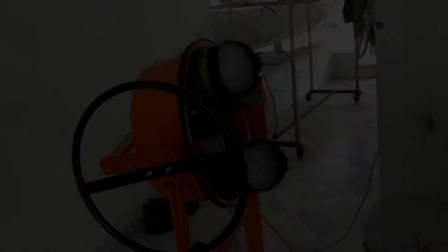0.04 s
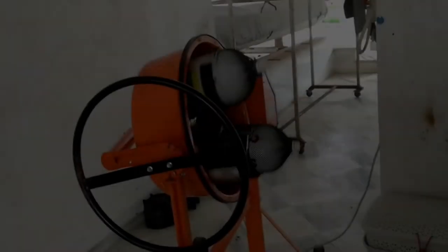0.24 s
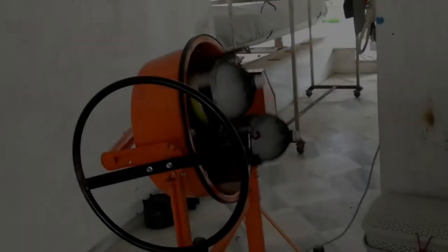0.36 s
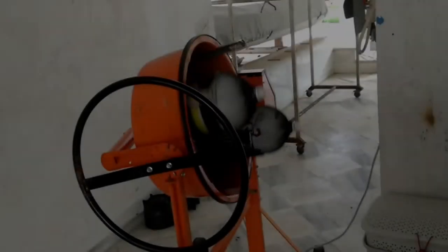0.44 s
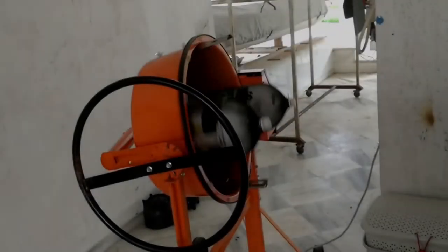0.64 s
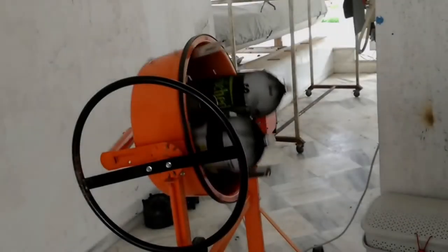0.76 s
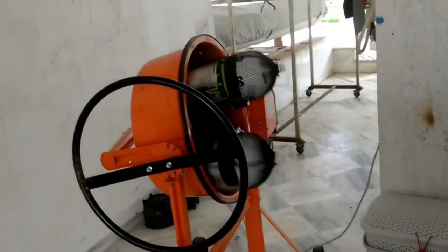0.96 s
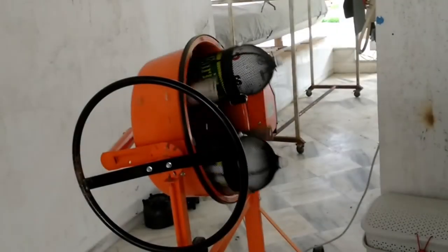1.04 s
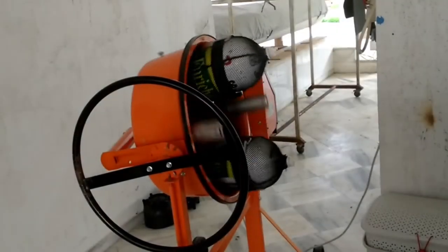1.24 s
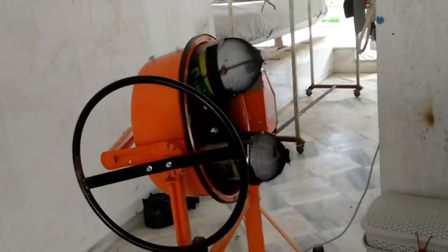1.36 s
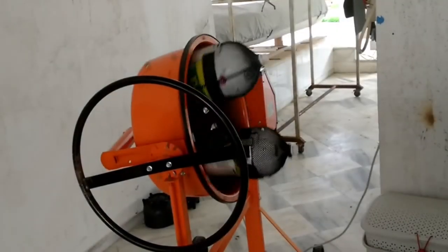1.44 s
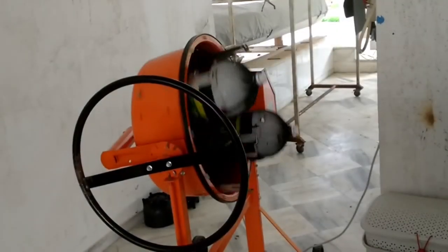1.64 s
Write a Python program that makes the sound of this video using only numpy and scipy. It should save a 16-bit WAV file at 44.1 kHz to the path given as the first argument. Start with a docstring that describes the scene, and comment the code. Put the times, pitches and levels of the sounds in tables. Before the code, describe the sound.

An electric mixer drum turns with metal tanks tumbling inside. It starts at about 0.2 seconds, after silence and a microphone pop. The motor hums and whines, the gears rattle, and the steel shell booms and groans as the tanks roll and scrape. Soft thuds come around 0.3 seconds, stronger ones from 1.4 to 1.6 seconds, echoing briefly in a bare room over light hiss.

```python
"""A pop as the microphone switches on, then an electric mixer drum turning in a bare room.
The motor hums and whines, and a small gear (the pinion) rattles along the big ring gear.
Two metal tanks tumble inside: they roll and bump against the steel shell and make it boom and groan.
The microphone adds its own hiss and a faint low tone on the left."""
import sys
import numpy as np
from scipy import signal
from scipy.fft import rfft, irfft
from scipy.io import wavfile
from scipy.ndimage import uniform_filter1d

SR = 44100
rng = np.random.default_rng(int(sys.argv[2]) if len(sys.argv) > 2 else 0)


def waveform_to_disk(signal):
    """Save audio, clipped to [-1, 1], as 16-bit WAV at the path in sys.argv[1]."""
    frames = np.transpose(np.atleast_2d(signal))
    scaled = np.clip(frames, -1, 1) * 32767
    samples = np.round(scaled).astype(np.int16)
    wavfile.write(sys.argv[1], SR, samples)


N = 74970
TIME = np.arange(N) / SR
PAN = np.array([[.5], [-.5]])  # splits a left-minus-right level between the two sides

# A mode is a pitch at which metal rings; a wider one dies sooner.
# low modes of the shell: pitch_hz, width_hz, relative_db
LOW_MODES = [(121.4, 9.7, -3.5), (153, 13, -1.5), (203.8, 19, -3), (226.5, 17, -1), (248.6, 35, 0),
             (291.3, 24, -2), (322.4, 18.5, -0.5), (338.6, 20.7, 1.5), (374, 17.5, -1.5)]
# middle modes of the shell and tanks: pitch_hz, width_hz, relative_db
MIDDLE_MODES = [(459, 34, -1), (501.4, 21.5, -0.5), (557.6, 21, -3), (610.4, 8, -7.5), (664.2, 20, -2.5),
                (731, 15, -6), (790, 32, -3), (886, 27, -9.5), (950, 46, -3)]


def from_db(db):
    """Turn decibels into a number to multiply by."""
    return 10 ** (np.asarray(db) / 20)


def rms_one(x):
    """Scale a sound so that its average strength (rms) is one."""
    return x / np.sqrt(np.mean(x ** 2) + 1e-20)


def in_time(rows):
    """Join (time, value) points with straight lines."""
    return np.interp(TIME, *np.transpose(rows))


def over_pitch(rows, column=1):
    """Join (pitch, value) points into a curve across the whole spectrum."""
    rows = np.array(rows)
    hz = np.fft.rfftfreq(N, 1 / SR)
    return np.interp(np.log(hz + 1e-9), np.log(rows[:, 0]), rows[:, column])


def drift(rate_hz, step=40):
    """A slow random wander, about one in size, worked out every few samples."""
    memory = np.exp(-2 * np.pi * step * rate_hz / SR)
    run_in = 2000
    noise = rng.standard_normal(N // step + run_in + 2)
    slow = signal.lfilter([1], [1, -2 * memory, memory ** 2], noise)[run_in:]
    return np.interp(np.arange(N) / step, np.arange(len(slow)), rms_one(slow))


def wavering(hz, waver, rate_hz=4.7):
    """A tone that wanders in loudness and a little in pitch."""
    phase = 2 * np.pi * (hz * TIME + rng.random())
    tone = (1 + waver * drift(rate_hz)) * np.sin(phase)
    return rms_one(tone + waver * drift(rate_hz) * np.cos(phase))


def colour(x, spectrum, column=1):
    """Turn each pitch in a sound up or down by a table of decibels."""
    return irfft(rfft(x) * from_db(over_pitch(spectrum, column)), N)


def widen(mid, side):
    """Two unrelated sounds become left and right: alike in the bass, apart in the treble."""
    # how alike the two sides are: pitch_hz, likeness (1 = the same, 0 = unrelated)
    likeness = [(60, 1), (120, 0.99), (240, 0.97), (480, 0.88), (950, 0.86), (1300, 0.36), (1900, 0.075),
                (3800, -0.1), (7500, -0.22)]
    alike = np.clip(over_pitch(likeness), -.99, .99)
    shared = np.sqrt((1 + alike) / 2) * rfft(mid)
    opposite = np.sqrt((1 - alike) / 2) * rfft(side) * [[1], [-1]]
    return irfft(shared + opposite, N)


def resonate(x, hz, width_hz):
    """Let a sound ring one mode."""
    decay = np.exp(-np.pi * width_hz / SR)
    feedback = [1, -2 * decay * np.cos(2 * np.pi * hz / SR), decay ** 2]
    return signal.lfilter(np.array([1, 0, -1]) * (1 - decay ** 2) / 2, feedback, x + 1e-18)


def room(x, fade_s=0.58, echo_db=1.5):
    """Bare walls add a smooth echo that falls 60 dB in fade_s."""
    tail = rng.standard_normal(N) * from_db(-60 * TIME / fade_s)
    return x + from_db(echo_db) * signal.fftconvolve(x, tail / np.linalg.norm(tail))[:N]


def rush(average_db=-38.5, follow=0.89, pan_db=-1.0):
    """Motor air and scraping fill the room, louder as the tanks slide."""
    # tone colour of the rush: pitch_hz, relative_db
    spectrum = [(30, -12), (60, -1), (110, -9.5), (300, -6.5), (600, -4.5), (1000, -8.5), (1500, -3.5),
                (2000, -7), (2600, -9.5), (3200, -15.5), (4100, -10.5), (5500, -32), (13000, -29.5)]
    # how strongly the tanks scrape: time_s, relative_db
    scrape = [(0.24, -41.5), (0.37, -44.5), (0.42, -42.5), (0.5, -45), (0.72, -44.5), (0.77, -42.5),
              (0.86, -46), (1.35, -45), (1.42, -42), (1.52, -44), (1.69, -41)]
    scrape_db = in_time(scrape)
    swell_db = follow * (scrape_db - scrape_db.mean())
    air = rms_one(widen(*colour(rng.standard_normal((2, N)), spectrum)))
    return from_db(average_db + swell_db + pan_db * PAN) * air


def motor():
    """Mains power makes the motor hum, the gears whine, and both add weaker tones."""
    # strength of the hum: time_s, relative_db
    hum = [(0.24, -33), (0.464, -31.5), (0.544, -49.5), (0.576, -31.5), (0.636, -42), (0.668, -33.5),
           (0.792, -38.5), (0.824, -46), (0.88, -37.5), (0.916, -63), (1.106, -37), (1.138, -52),
           (1.446, -32.5), (1.466, -40), (1.586, -31.5), (1.68, -39)]
    # the whine swells and fades: time_s, level_db
    whine = [(0.24, -43), (0.42, -45), (0.7, -50), (0.8, -43), (0.95, -53), (1.15, -41), (1.32, -48.5),
             (1.45, -42), (1.54, -54), (1.69, -47)]
    # lasting motor and gear tones: pitch_hz, level_db, waver_share, left_minus_right_db
    tones = [(86.5, -48.5, 0.61, -1), (199.2, -51, 1, 0), (881, -54, 0.62, 11.5), (1083, -56.5, 0.14, 17.5),
             (1223, -58, .5, 2)]
    out = from_db(in_time(hum) - 1.5) * wavering(hz=99.1, waver=.06)
    out += from_db(in_time(whine)) * wavering(hz=1282, waver=.15)
    for hz, db, waver, pan_db in tones:
        out = out + from_db(db + pan_db * PAN) * wavering(hz, waver)
    return out


def groans(fade_s=0.046):
    """A rolling tank rubs the shell: one note swells and dies away each time."""
    # the rubs: start_s, length_s, pitch_hz, level_db
    rubs = [(0.224, 0.086, 311, -33), (0.422, 0.21, 548, -40), (0.553, 0.14, 1331, -43.5),
            (0.56, 0.095, 819, -41), (0.721, 0.2, 353, -41.5), (0.744, 0.11, 1301, -45),
            (0.927, 0.12, 340.2, -38), (0.96, 0.31, 203.7, -41.5), (0.985, 0.27, 224, -43.5),
            (1.093, .18, 653, -43.5), (1.21, 0.097, 509, -39), (1.312, 0.13, 351, -36),
            (1.356, 0.12, 507.8, -32.5), (1.375, 0.12, 963, -45.5), (1.46, 0.23, 319, -37),
            (1.58, 0.09, 509, -33.5)]
    out = np.zeros(N)
    for start_s, length_s, hz, db in rubs:
        swell = np.clip(np.minimum(TIME - start_s, start_s + length_s - TIME) / fade_s, 0, 1)
        out += from_db(db) * swell * wavering(hz, waver=0.34)
    return out


def bumps(spread_octaves=0.27):
    """A tank hits the shell with a dull thud, ringing the modes near one pitch; the room echoes it."""
    # the hits: start_s, peak_db (before the echo), centre_hz
    hits = [(0.243, -29.5, 303), (0.325, -29, 160), (1.364, -21.5, 343), (1.516, -24.5, 221),
            (1.583, -22, 300)]
    out = np.zeros(N)
    for start_s, db, centre_hz in hits:
        age = np.maximum(TIME - start_s, 0)
        thud = np.zeros(N)
        for hz, width_hz, mode_db in LOW_MODES + MIDDLE_MODES:
            strength = from_db(mode_db) * np.exp(-.5 * (np.log2(hz / centre_hz) / spread_octaves) ** 2)
            thud += strength * np.exp(-np.pi * width_hz * age) * np.sin(2 * np.pi * hz * age)
        out += from_db(db) * thud / np.abs(thud).max()
    return room(out)


def contacts(teeth, taps_per_s=1500, spread_db=2.5, wash_db=-1.0):
    """Many tiny taps, harder as each gear tooth catches; smooth noise stands for their echo."""
    sizes = from_db(spread_db * np.minimum(rng.exponential(1, N), 4)) * rng.choice([-1, 1], N)
    taps = teeth * sizes * (rng.random(N) < taps_per_s / SR)
    return rms_one(taps) + from_db(wash_db) * rng.standard_normal(N)


def ringing_metal(modes, level_db, teeth):
    """Tiny taps ring a set of modes, and the ringing is made to follow level_db."""
    force = np.array([contacts(teeth), contacts(teeth)])
    ringing = sum((-1) ** k * from_db(db) * rms_one(resonate(force, hz, width_hz))
                  for k, (hz, width_hz, db) in enumerate(modes))
    edges_hz = [modes[0][0] * 0.7, modes[-1][0] * 1.12]
    band = signal.butter(2, edges_hz, "band", fs=SR, output="sos")
    ringing = widen(*signal.sosfilt(band, ringing))
    power = uniform_filter1d(ringing.mean(axis=0) ** 2, 3500)  # averaged over about 80 ms
    return from_db(level_db) * ringing / np.sqrt(power + 1e-12)


def drum(teeth_per_s=25.5, tooth_fade_s=0.0067, tooth_push=1.2):
    """The pinion and the rolling tanks keep the shell and the ring gear sounding."""
    # the shell's low boom: time_s, relative_db
    boom = [(0.24, -31), (0.554, -37), (0.602, -33.5), (0.724, -37), (0.832, -36), (0.91, -43),
            (0.974, -35.5), (1.338, -35.5), (1.362, -33.5), (1.478, -33), (1.512, -32), (1.572, -34.5),
            (1.592, -32), (1.69, -29.5)]
    # the middle ringing of the shell and tanks: time_s, level_db
    ring = [(0.24, -37), (0.296, -39.5), (0.828, -37), (0.852, -41.5), (1.12, -37.5), (1.176, -45),
            (1.22, -33.5), (1.244, -43), (1.256, -36), (1.342, -40), (1.418, -33), (1.43, -37.5),
            (1.596, -38), (1.608, -58), (1.632, -36), (1.69, -39)]
    # the gear's grinding: time_s, relative_db
    grind = [(0.24, -36.5), (0.506, -40), (0.638, -35), (0.712, -46), (0.732, -36), (0.84, -40.5),
             (0.856, -42), (1.29, -39.5), (1.298, -40.5), (1.402, -37.5), (1.418, -43), (1.45, -33),
             (1.508, -39.5), (1.69, -40.5)]
    # modes of the ring gear: pitch_hz, width_hz, relative_db
    gear_modes = [(1148, 81, -3.5), (1229, 72, -2.5), (1301, 29, -2), (1325, 40, -3), (1405, 29, -10)]
    tooth_age = TIME % (1 / teeth_per_s)
    teeth = 1 + tooth_push * np.exp(-tooth_age / tooth_fade_s)
    return (ringing_metal(LOW_MODES, in_time(boom) - 3, teeth)
            + ringing_metal(MIDDLE_MODES, in_time(ring), teeth)
            + ringing_metal(gear_modes, in_time(grind) - 4, teeth))


def scene():
    """The whole mixer with the tanks inside."""
    return motor() + drum() + bumps() + groans() + rush()


def record(dry):
    """Silent at first, the microphone pops on, adds hiss and a low tone, and cuts the highest treble."""
    # tone colour of the hiss: pitch_hz, left_relative_db, right_relative_db
    hiss_spectrum = [(1000, -6.5, -7.5), (3000, -4.5, 1), (4570, -1, -0.5), (6240, -0.5, -5),
                     (9130, 0.5, -6.5), (10340, -7, -8.5), (11900, -7.5, -7.5), (14000, -10.5, -8.5)]
    hiss_db, tone_db, tone_hz = -41.5, -44.5, 39.7
    switch_on_s, settle_s, cutoff_hz = .2105, .175, 14300
    left, right = rng.standard_normal((2, N))
    hiss = np.array([colour(left, hiss_spectrum, column=1), colour(right, hiss_spectrum, column=2)])
    sound = dry + from_db(hiss_db) * rms_one(hiss)
    sound[0] += from_db(tone_db) * np.sqrt(2) * np.sin(2 * np.pi * tone_hz * TIME)  # left only
    age = np.maximum(TIME - switch_on_s, 0)
    pop = np.array([[-.82], [.085]]) * np.exp(-(age / settle_s) ** 1.25)  # a jump, mostly on the left
    sound = (sound + pop) * (TIME >= switch_on_s)
    treble_cut = signal.firwin(401, cutoff_hz, fs=SR)
    return signal.fftconvolve(sound, treble_cut[None], "same", axes=1)


dry = scene()
out = record(dry)
waveform_to_disk(out)
```